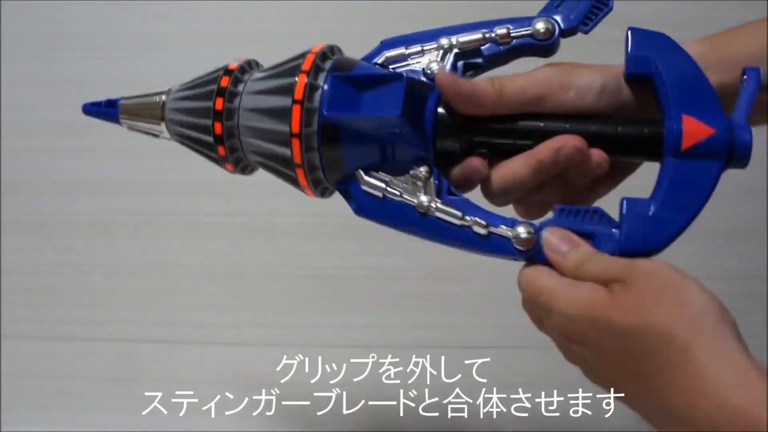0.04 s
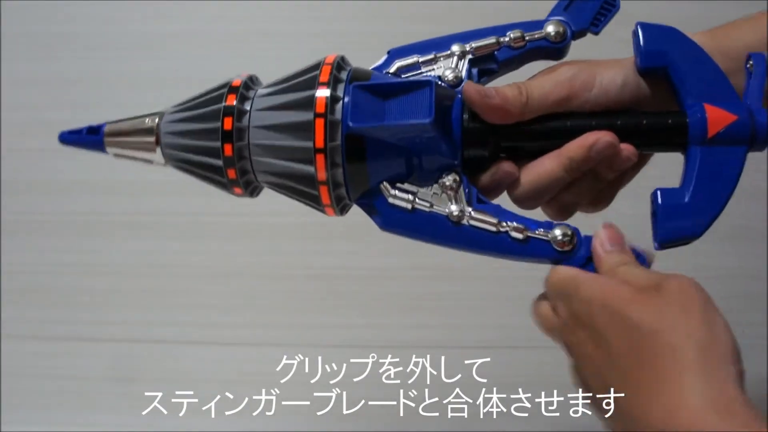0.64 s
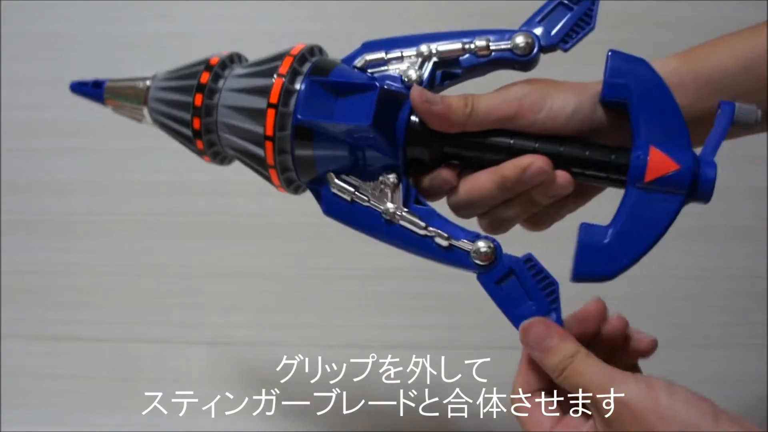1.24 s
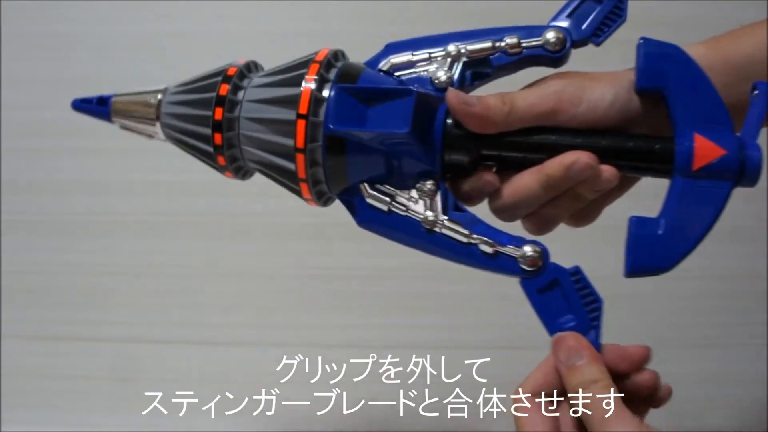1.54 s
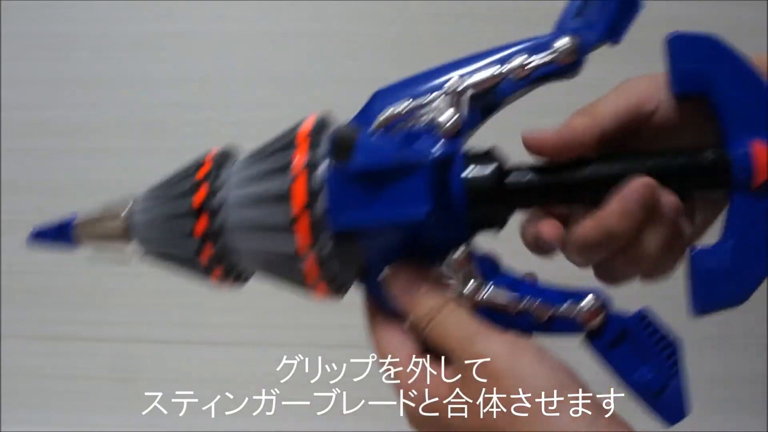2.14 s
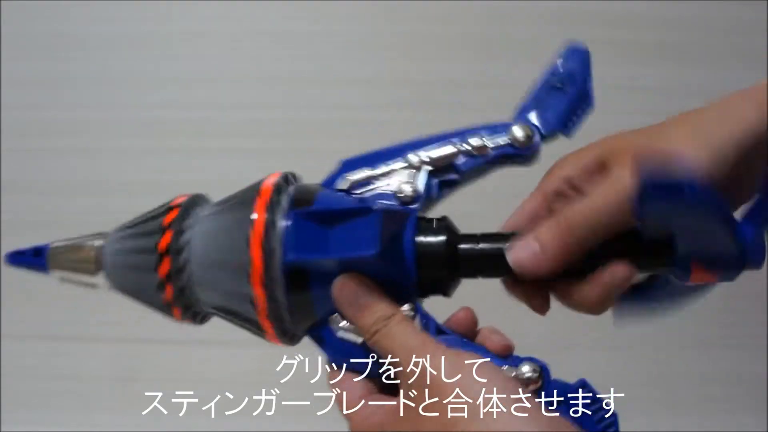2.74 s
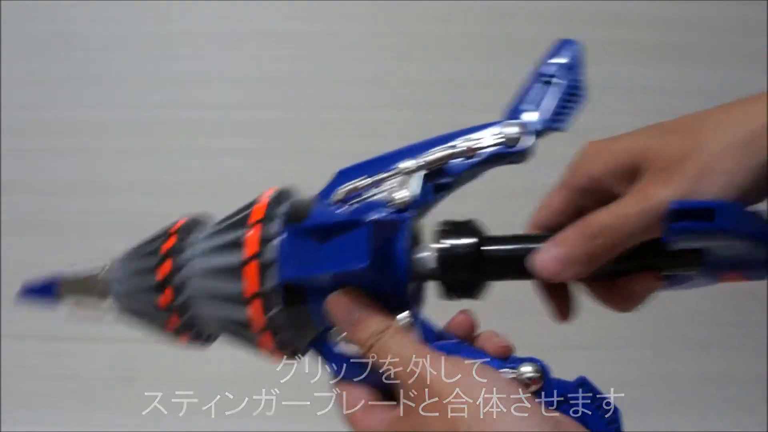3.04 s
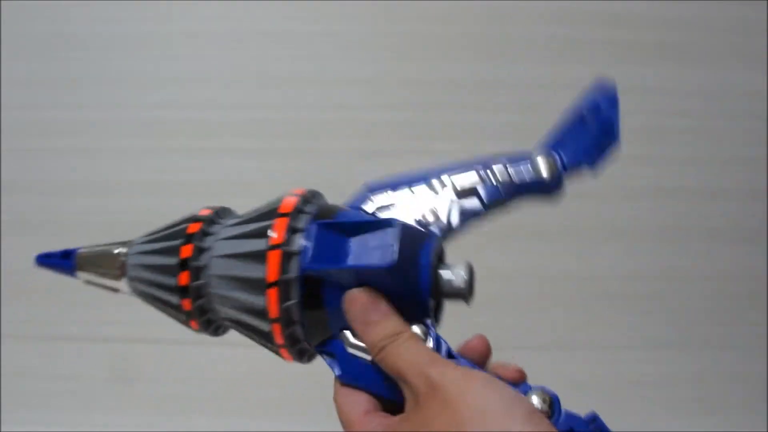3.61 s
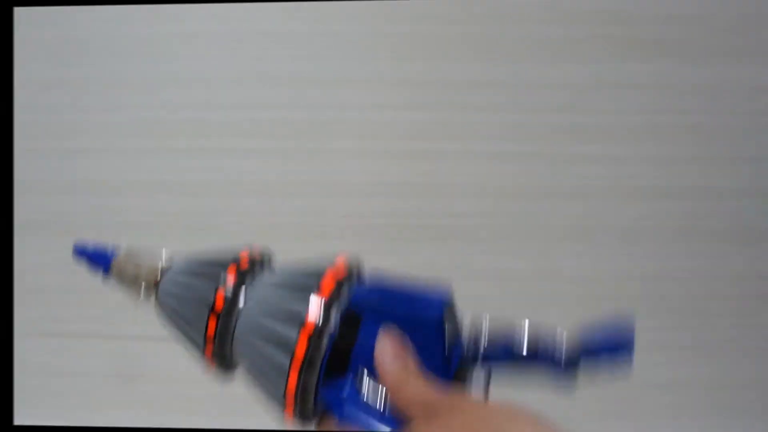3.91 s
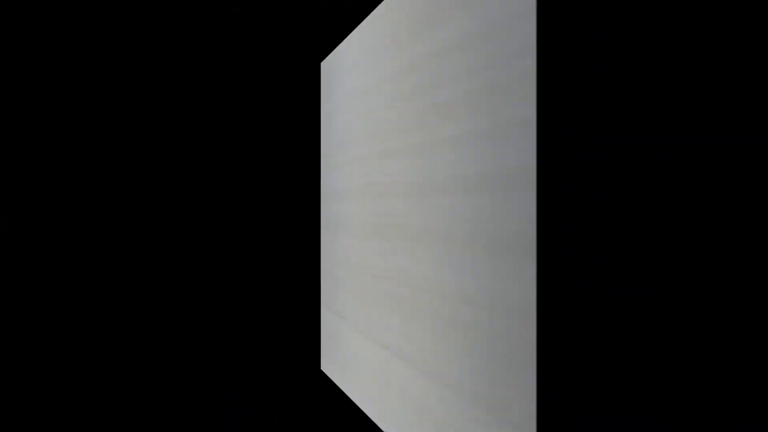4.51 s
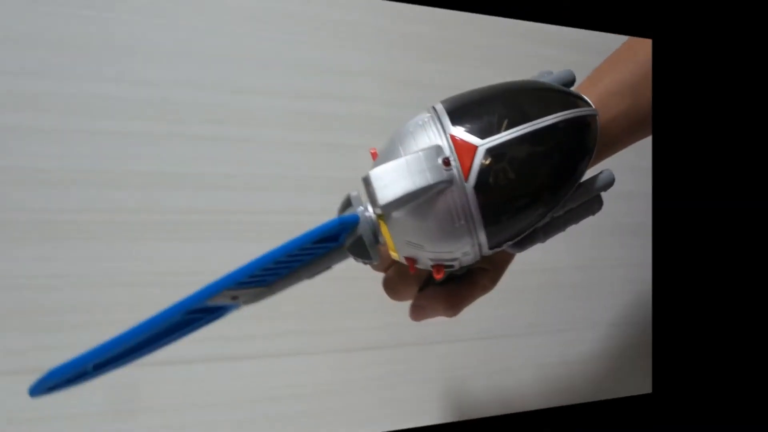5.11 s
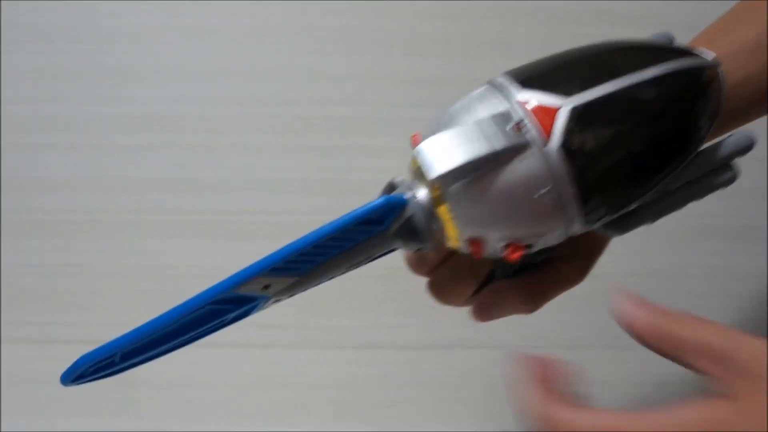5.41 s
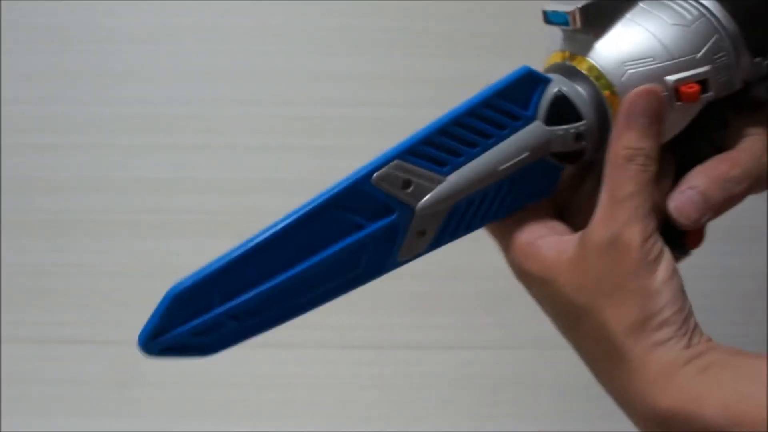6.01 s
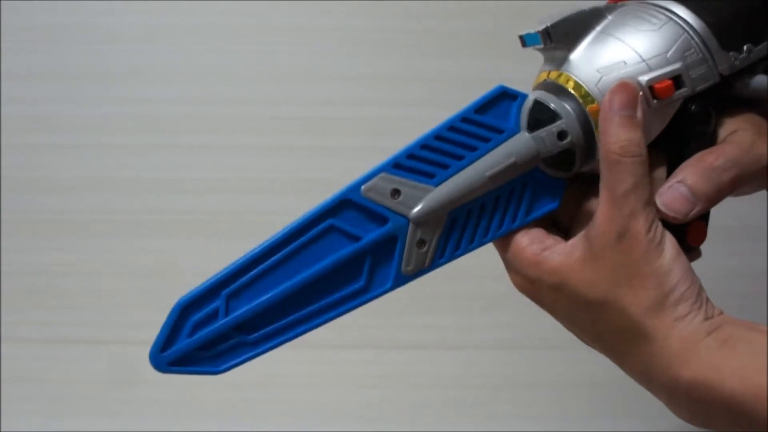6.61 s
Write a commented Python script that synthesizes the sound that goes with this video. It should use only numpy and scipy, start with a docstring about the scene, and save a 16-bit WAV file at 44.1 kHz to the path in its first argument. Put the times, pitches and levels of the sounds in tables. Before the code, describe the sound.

Hands work a plastic toy drill, snapping a claw open and popping its grip out, then a toy sword clacks over faint hiss.

```python
"""Light plastic clicks and scrapes: a hollow toy drill is handled over a table in a small room. Its claws snap
open, its grip is twisted and pops out of the socket, then the scene changes and a toy sword clacks in the
hands. Each impact or slip excites the resonant modes of a shell, and the room reverberates. Beneath lie a hum,
room air and hiss, whose level steps up as the scene changes, and the faint whine of a camera's lens as it
focuses. The camera's gain ducks after each loud snap and creeps back."""
import sys
import numpy as np
from scipy import signal
from scipy.fft import rfft, irfft, next_fast_len
from scipy.io import wavfile
from scipy.ndimage import uniform_filter1d, map_coordinates

SR = 44100
rng = np.random.default_rng(int(sys.argv[2]) if len(sys.argv) > 2 else 0)


def generate_wav(sig):
    """Save sig (samples, or channels by samples) to the path in sys.argv[1] as 16-bit PCM at SR."""
    pcm = np.round(np.clip(np.atleast_2d(sig).T, -1, 1) * 32767).astype(np.int16)
    wavfile.write(sys.argv[1], SR, pcm)


N = 297674

# Impacts: (time [s], relative clack level [dB], low knock re clack [dB], high snap re clack [dB])
DRILL_HITS = [(.057, -28, -5, 3.5), (.08, -38, -5, 0), (.117, -29.5, -8.5, -1.5), (.243, -37, -8, -6),
              (.258, -47, -13, 8.5), (.31, -34.5, -13, -12), (.347, -42.5, -9, 6), (.5005, -27, -7.5, -14),
              (.567, -33, -8, -24), (.837, -29.5, -25, -15), (.89, -32.5, -5, -26),
              (1.375, -40.5, -1, -4.5), (1.437, -42, -20, 7.5), (1.637, -28.5, -33, -7.5),
              (1.746, -27, -3.5, -8), (1.963, -34.5, -0.5, -15), (1.976, -26.5, -19, -24),
              (2.026, -37, -1.5, 0.5), (2.046, -40, -12, 6.5), (2.116, -40, -13, 7),
              (2.146, -31, -3.5, -23), (2.359, -42, 2, -11), (2.454, -37.5, -3, -9),
              (2.495, -31.5, -15, -30), (2.589, -33.5, -5.5, -31), (2.715, -24.5, -7.5, -17),
              (2.759, -32, -5.5, -6), (2.812, -30, -10, -14), (2.839, -29, -5, -16),
              (2.869, -15.5, -11.5, -12), (2.888, -20, -14, -26), (3.102, -32.5, -3, -8),
              (3.118, -30.5, -6, -7), (3.775, -18.5, -4, -4), (3.786, -16.5, -16, -13)]  # contacts on the drill
CLAW_HITS = [(.7105, -11, -16.5, 4.5), (.7235, -11.5, -7, 1), (.73, -10.5, -7.5, -46)]  # the claw snaps off its catch and slams open
GRIP_HITS = [(3.14, -16, -6.5, 2.5), (3.159, -23, -13, -11)]  # the grip pops out and its catch springs back
SWORD_HITS = [(4.129, -38, -12, -9), (4.306, -31, -22, -6.5), (4.337, -30.5, -22, -26),
              (4.521, -39, 1.5, -4), (4.62, -37.5, -2, -14), (5.857, -37, 6, -20), (6.0555, -15.5, -2, -4),
              (6.09, -37.5, 13, -12), (6.176, -25, 4, 3), (6.236, -37, 8, -7), (6.274, -22, 4.5, 1.5),
              (6.286, -14.5, 2, -5.5), (6.313, -24.5, 5, 2.5), (6.355, -22, -2, -11), (6.412, -41, -5, -14),
              (6.597, -23, 0.5, 1), (6.654, -37.5, -14, 0), (6.684, -37, 0, -16)]  # contacts on the sword
SWORD_CATCH = [(6.441, -14, -7, -3.5)]  # a catch clicks home
# Plastic sliding on plastic and skin: (time of hardest push [s], level [dB], build-up [s])
DRILL_STROKES = [(.1, -42, 0.44), (.37, -45, 0.4), (.49, -39.5, 0.2), (.9, -40, 0.067),
                 (1.75, -41.5, 0.055), (2.08, -50, 1), (2.4, -53.5, 0.78), (2.6, -49, 0.39),
                 (2.74, -42, 0.045), (2.87, -36, 0.2), (3.122, -36.5, 0.048), (3.81, -30, 0.037)]
SWORD_STROKES = [(4.14, -45, .04), (4.35, -40.5, 0.052), (5.32, -46, 0.28), (5.88, -44.5, .05),
                 (6.09, -32.5, 0.075), (6.27, -33.5, 0.072), (6.34, -30.5, 0.13)]
# Scrape of the claw's hinge as it opens: (time [s], level [dB])
HINGE_SCRAPE = [(.4, -95), (.44, -54), (.472, -41), (.505, -41), (.535, -54), (.58, -95)]
# Shell resonances: (frequency [Hz], bandwidth [Hz], peak lift [dB])
DRILL_MODES = [(695, 140, -0.5), (993, 430, 8), (1300, 110, -5), (1868, 110, 12), (1907, 140, 4.5),
               (2820, 310, 0), (4440, 2100, 2), (6740, 650, 2), (9400, 180, 3.5)]
CLAW_MODES = [(730, 85, 6.5), (1000, 76, 11), (1080, 60, 3.7), (1280, 140, 9.6), (1763, 86, 8.4),
              (1870, 55, 3.3), (2640, 200, 4.4), (3980, 370, 9.7), (7000, 210, 6.1), (9260, 580, 9.9)]
GRIP_MODES = [(375, 31, 21), (593, 50, 18.4), (1120, 51, 18.5), (1610, 75, 4.1), (1790, 230, 11.3),
              (2700, 250, 8.7), (4080, 150, 21.6), (6100, 680, 11.8), (8500, 400, 5.3), (9200, 460, 7.6)]
HINGE_MODES = [(1900, 300, 5), (4280, 400, 14)]
SWORD_MODES = [(657.7, 18, 15.7), (826, 12, 13.6), (890, 43, 12), (1200, 33, 5), (1460, 46, 2.9),
               (1917, 40, 6.6), (2110, 52, 3.9), (2285, 130, 3.2), (2694, 110, 2.9), (3870, 130, 1.8)]
# Broad spectral envelopes of the shells: (frequency [Hz], relative level [dB])
DRILL_BODY = [(60, -45), (170, -17), (300, -6), (600, -7.5), (1100, -2.5), (2000, 1), (3200, -1.5),
              (6000, -2.5), (11000, -7), (12300, -17), (13500, -39), (16000, -32)]
CLAW_BODY = [(60, -24), (170, -17), (300, -4.5), (600, -9), (1100, -2), (2000, 1), (3200, -6.5),
             (5800, -3.5), (8000, -6), (11200, 0.5), (12300, -11), (13500, -16), (16000, -19)]
GRIP_BODY = [(60, -33.5), (200, -28), (450, -14), (900, 2.5), (2000, -5), (3200, -10.5), (6000, -4),
             (11000, 6), (12100, -4.5), (13000, -29), (16000, -51)]
SWORD_BODY = [(60, -68), (200, -9.5), (480, -14.5), (700, -2.5), (1100, 0.5), (2000, 1), (3300, -2.5),
              (5500, -10), (8000, -14), (11000, -19), (12200, -31), (13300, -37), (16000, -42)]
# Reverberation of the room: (frequency [Hz], time to decay by 60 dB [s])
ROOM_T60 = [(200, 0.15), (700, 0.2), (2000, 0.2), (5000, 0.22), (11000, 0.19)]
# Likeness of the two channels: (frequency [Hz], correlation [-1 to 1])
ROOM_CORRELATION = [(150, 0.43), (700, 0.76), (1800, 0.63), (4000, 0.06), (12000, 0)]
AIR_CORRELATION = [(30, .4), (85, .3), (150, .1), (400, -.25), (1500, -.2), (5000, -.05), (12000, 0)]
# Runs of the focus motor: (time [s], duration [s], first frequency [Hz], last frequency [Hz])
FOCUS_RUNS = [(2.175, .07, 10700, 10150), (2.243, .06, 10550, 10050), (2.465, .06, 11750, 10500),
              (2.503, .065, 10600, 10200), (6.49, .12, 10100, 11900), (6.61, .09, 11200, 12800)]
# Tones of a distant appliance: (frequency [Hz], level [dB])
HUM_TONES = [(88, -66), (135, -65)]
# Spectrum of room air and hiss: (frequency [Hz], relative spectral density [dB])
AIR_SPECTRUM = [(10, -36), (25, -22.5), (50, -15.5), (85, -6), (135, -.5), (200, 0), (560, 0), (800, -3),
                (1100, -4), (1600, -8), (3000, -12), (6000, -16.5), (11200, -19.5), (12300, -23),
                (12900, -42), (16000, -46)]

HIT_SIZE = 16384  # samples in one impact with its reverberation
SOFT_CONTACT_S, HARD_CONTACT_S, HARDNESS_SPAN_DB = 0.0037, 0.002, 5
DRILL_AIR_DB, SWORD_AIR_DB, SWORD_IN_S = -46.5, -40, 3.94


def drill():
    """Impact and friction excite a hollow shell: claws click and snap, the grip scrapes and pops out."""
    clicks = impacts(DRILL_HITS, DRILL_BODY, DRILL_MODES, gain_db=18, room_db=-0.5, delay_s=.0015,
                     lag_s=.00003, pan_db=-0.8, soft_hz=2310, hard_hz=4200, part_db=5.5, stretch=1.04)
    snap = impacts(CLAW_HITS, CLAW_BODY, CLAW_MODES, gain_db=16, room_db=-1.5, delay_s=.00046,
                   lag_s=.00004, pan_db=-0.3, soft_hz=1860, hard_hz=5930, part_db=8, stretch=1.58,
                   scatter=0)
    pop = impacts(GRIP_HITS, GRIP_BODY, GRIP_MODES, gain_db=22, room_db=0, delay_s=.0007,
                  lag_s=.00003, pan_db=0, soft_hz=1150, hard_hz=1160, part_db=2, stretch=0.67, scatter=0)
    hinge_gain = amp(np.interp(np.arange(N) / SR, *np.transpose(HINGE_SCRAPE)))
    hinge = friction(hinge_gain, DRILL_BODY, HINGE_MODES, grain_db=2.5, slips_per_s=600)
    rubs = friction(strokes(DRILL_STROKES), DRILL_BODY, DRILL_MODES, grain_db=2, slips_per_s=450)
    return clicks + snap + pop + hinge + rubs


def sword():
    """A larger shell resonates lower: the hollow hilt clacks in the hands and a catch clicks home."""
    clacks = impacts(SWORD_HITS, SWORD_BODY, SWORD_MODES, gain_db=20.5, room_db=-3.5, delay_s=.0015,
                     lag_s=.000045, pan_db=-1.2, soft_hz=1920, hard_hz=2560, part_db=5.5, stretch=0.9)
    catch = impacts(SWORD_CATCH, SWORD_BODY, SWORD_MODES, gain_db=21, room_db=-5.5, delay_s=.0015,
                    lag_s=.000045, pan_db=-1.5, soft_hz=2630, hard_hz=2660, part_db=8.5, scatter=0)
    rubs = friction(strokes(SWORD_STROKES), SWORD_BODY, SWORD_MODES, grain_db=3, slips_per_s=800)
    return clacks + catch + rubs


def impacts(hits, body, modes, gain_db, room_db, delay_s, lag_s, pan_db, soft_hz, hard_hz, part_db,
            stretch=1, scatter=.15, part_q=18, ripple_db=3, ripple_hz=70, spread=0.75):
    """Impulse excitation: each contact rings the shell and the struck part, and the room answers."""
    out = np.zeros((2, N + HIT_SIZE))
    hz = np.fft.rfftfreq(HIT_SIZE, 1 / SR)
    above_knock = 1 - 1 / (1 + (hz / 1200) ** 6)
    above_clack = 1 - 1 / (1 + (hz / 4000) ** 6)
    bands = (1 - above_knock, above_knock - above_clack, above_clack)  # knock, clack, snap
    colour = shell(body, modes, hz)
    sides = np.array([[1], [-1]])  # left, right
    for s, level_db, knock_db, snap_db in hits:
        # a contact with more snap is harder: it ends sooner and rings a smaller, higher part
        hardness = 1 / (1 + np.exp(-snap_db / HARDNESS_SPAN_DB))
        contact_s = stretch * (SOFT_CONTACT_S + hardness * (HARD_CONTACT_S - SOFT_CONTACT_S))
        part_hz = soft_hz * (hard_hz / soft_hz) ** hardness * np.exp(scatter * rng.standard_normal())
        part = shell([(1, 0)], [(part_hz, part_hz / part_q, part_db)], hz)
        # the many minor modes share the blow differently at every point of contact
        minor = amp(ripple_db * map_coordinates(rng.standard_normal(512), [hz / ripple_hz], order=1))
        ring = minimum_phase(sum(amp(db) * unit(band * colour * part * minor)
                                 for db, band in zip((knock_db, 0, snap_db), bands)))
        # treble radiates differently to each microphone; the sound reaches the right one first
        direct = chatter(contact_s) + sides * spread * hz / (hz + 1500) * chatter(contact_s)
        heard = direct * np.exp(-1j * np.pi * hz * lag_s * sides) + amp(room_db) * rfft(room_tail())
        start = round((s + delay_s) * SR)
        gain = amp(gain_db + level_db + sides * pan_db / 2)
        out[:, start:start + HIT_SIZE] += gain * irfft(ring * heard)
    return out[:, :N]


def chatter(contact_s, rise_share=0.88):
    """Broadband excitation: the nearly flat spectrum of hard faces chattering for milliseconds."""
    age = np.arange(HIT_SIZE) / SR / contact_s
    burst = rng.standard_normal(HIT_SIZE) * (1 - np.exp(-(age / rise_share) ** 2)) * np.exp(-age)
    whitened = irfft(np.exp(1j * np.angle(rfft(burst))))
    return rfft(unit(whitened * np.exp(-(age / 5) ** 2))) / np.sqrt(HIT_SIZE)


def shell(body, modes, hz):
    """Modal resonance: a shell's gain is a set of Lorentzian peaks on a broad spectral envelope."""
    peaks = sum((amp(2 * db) - 1) / (1 + (2 * (hz - centre) / width) ** 2) for centre, width, db in modes)
    return amp(along(body, hz)) * np.sqrt(np.maximum(1 + peaks, .1))


def minimum_phase(gain):
    """Causality: folding the cepstrum gives a response of this gain that rings only after the blow."""
    cepstrum = irfft(np.log(np.maximum(gain, 1e-6)))
    half = len(cepstrum) // 2
    cepstrum[1:half] *= 2
    cepstrum[half + 1:] = 0
    return np.exp(rfft(cepstrum))


def friction(gain, body, modes, grain_db, slips_per_s):
    """Stick-slip friction: sliding faces catch and release in tiny grains that sound through the shell."""
    pressure_db = 2.5 * wobble(45)
    grains = stereo_noise(ROOM_CORRELATION, N) * amp(grain_db * wobble(slips_per_s) + pressure_db)
    return gain * unit(filtered(grains, lambda hz: shell(body, modes, hz)))


def strokes(rows, depth_db=23, release_s=.09):
    """Incoherent strokes add in power; the gain of each swells to its hardest push, then lets go."""
    t, power = np.arange(N) / SR, np.zeros(N)
    for s, db, build_s in rows:
        from_peak = np.maximum((s - t) / build_s, (t - s) / release_s)
        power += amp(db - depth_db * np.clip(from_peak, 0, 10)) ** 2
    return np.sqrt(power)


def room_tail(build_s=0.0048):
    """Reverberation: a random stereo impulse response of unit energy builds and decays exponentially."""
    hz, t, spectra = signal.stft(stereo_noise(ROOM_CORRELATION, HIT_SIZE), SR, nperseg=256)
    decay = amp(-60 * t / along(ROOM_T60, hz)[:, None])
    tail = signal.istft(spectra * decay, SR, nperseg=256)[1][:, :HIT_SIZE]
    tail *= 1 - np.exp(-(np.arange(HIT_SIZE) / SR / build_s) ** 2)
    return unit(tail) / np.sqrt(HIT_SIZE)


def focus_motor(re_air_db=-14, flutter_hz=110):
    """Frequency modulation: the motor's thin whine glides and flutters as each run swells and fades."""
    t, out = np.arange(N) / SR, np.zeros(N)
    flutter = flutter_hz * wobble(400)
    for s, length, first_hz, last_hz in FOCUS_RUNS:
        on = (t > s) & (t < s + length)
        progress = (t[on] - s) / length
        hz = first_hz + (last_hz - first_hz) * progress + flutter[on]
        out[on] += np.sqrt(np.sin(np.pi * progress)) * np.sin(2 * np.pi * np.cumsum(hz) / SR)
    return amp(re_air_db) * air_gain() * out


def hum(waver_hz=1.57):
    """Nearly periodic vibration: a distant appliance radiates two low, slightly unsteady tones."""
    return sum(amp(db) * np.sin(2 * np.pi * np.cumsum(hz + waver_hz * wobble(9)) / SR)
               for hz, db in HUM_TONES)


def air():
    """Broadband noise: room air and hiss, nearly uncorrelated at the two microphones."""
    noise = filtered(stereo_noise(AIR_CORRELATION, N), lambda hz: amp(along(AIR_SPECTRUM, hz)))
    return unit(noise) * air_gain()


def air_gain():
    """The noise floor's rms amplitude, which steps up where the scene changes to the sword."""
    return amp(np.where(np.arange(N) / SR < SWORD_IN_S, DRILL_AIR_DB, SWORD_AIR_DB))


def stereo_noise(correlation, size):
    """Mid-side mixing: the balance of two white noises sets the correlation between the channels."""
    def balance(hz):
        angle = np.arccos(along(correlation, hz)) / 2
        return np.array([np.cos(angle), np.sin(angle)])
    mid, side = filtered(rng.standard_normal((2, size)), balance)
    return np.array([mid + side, mid - side])


def filtered(x, response):
    """Linear filtering: the spectrum of x is multiplied by a frequency response."""
    n = x.shape[-1]
    padded = next_fast_len(n + 4096, True)
    return irfft(rfft(x, padded) * response(np.fft.rfftfreq(padded, 1 / SR)), padded)[..., :n]


def wobble(rate):
    """Smooth random modulation: a spline through rate knots a second."""
    return map_coordinates(rng.standard_normal(int(N * rate / SR) + 4), [np.arange(N) * rate / SR])


def along(points, hz):
    """Interpolation of (frequency [Hz], value) points on a logarithmic frequency axis."""
    knots_hz, values = np.transpose(points)
    return np.interp(np.log(hz + 1), np.log(knots_hz + 1), values)


def amp(db):
    """Amplitude ratio of a level in decibels."""
    return 10 ** (np.asarray(db) / 20)


def unit(x):
    """Normalisation to an rms of 1."""
    return x / np.sqrt(np.mean(x ** 2) + 1e-20)


def gain_control(x, threshold_db=-22, share=0.58, attack_s=.04, recover_db_per_s=3):
    """Automatic gain control: a loud, bright snap ducks everything, then the gain creeps back."""
    treble_power = np.mean(np.diff(x, prepend=0) ** 2, axis=0)
    level_db = 10 * np.log10(np.abs(uniform_filter1d(treble_power, size=220)) + 1e-12)
    excess_db = np.maximum(level_db - threshold_db, 0)
    recovery_db = recover_db_per_s * np.arange(x.shape[1]) / SR
    duck_db = np.maximum.accumulate(share * excess_db + recovery_db) - recovery_db
    pole = np.exp(-1 / (attack_s * SR))
    return x * amp(-signal.lfilter([1 - pole], [1, -pole], duck_db))


def scene():
    """Superposition: both toys add to the air, the hum and the focus motor."""
    return drill() + sword() + air() + hum() + focus_motor()


def record(dry, top_hz=16300):
    """Compression, afresh for each toy; the camera then dulls the treble, saturates and band-limits."""
    halves = np.split(dry, [round(SWORD_IN_S * SR)], axis=1)
    ducked = np.hstack([gain_control(half) for half in halves])
    dulled = filtered(ducked, lambda hz: amp(along([(12100, 0), (13000, -7), (16000, -7)], hz)))
    return filtered(np.clip(dulled, -1, 1), lambda hz: hz < top_hz)


dry = scene()
out = record(dry)
generate_wav(out)
```